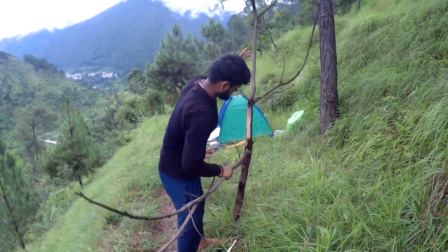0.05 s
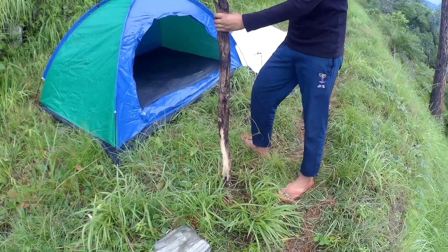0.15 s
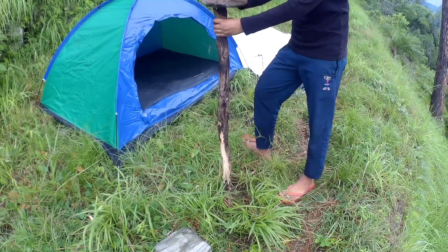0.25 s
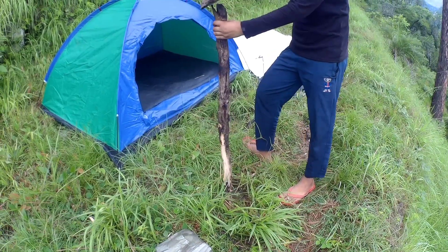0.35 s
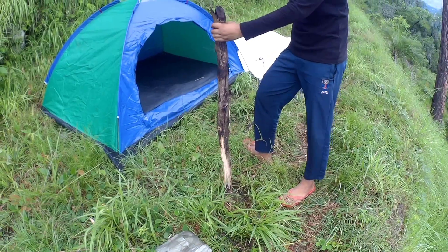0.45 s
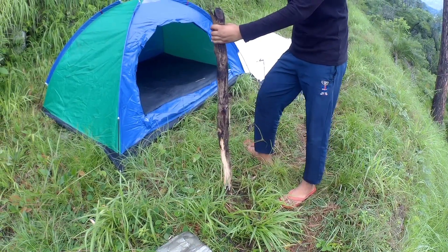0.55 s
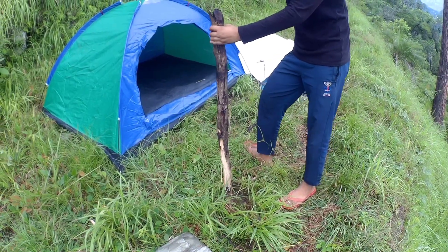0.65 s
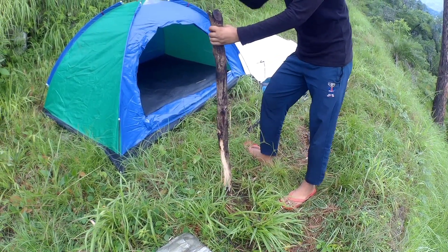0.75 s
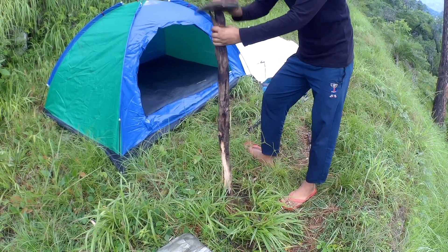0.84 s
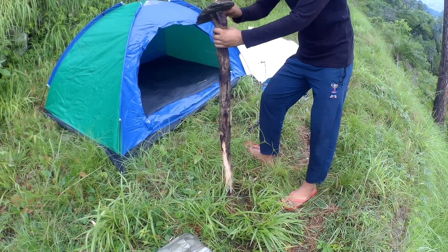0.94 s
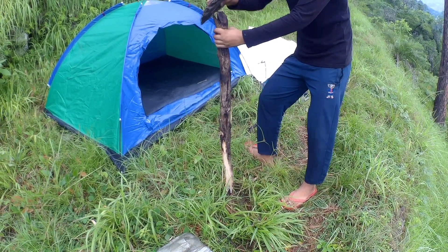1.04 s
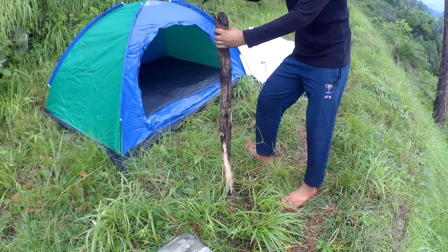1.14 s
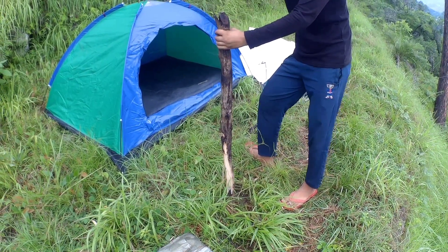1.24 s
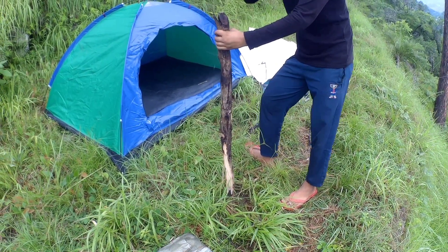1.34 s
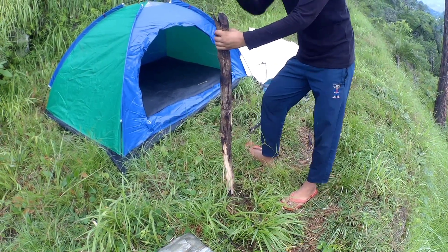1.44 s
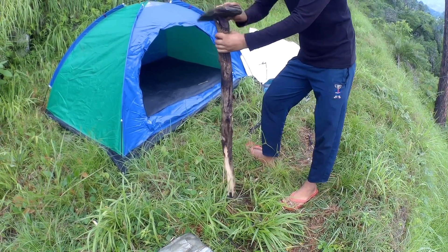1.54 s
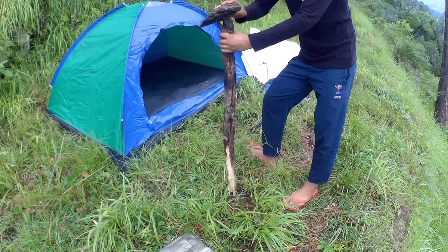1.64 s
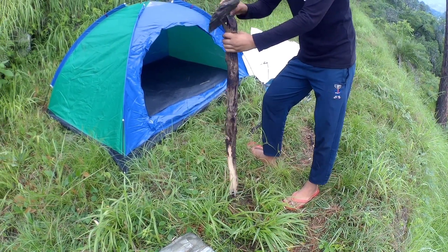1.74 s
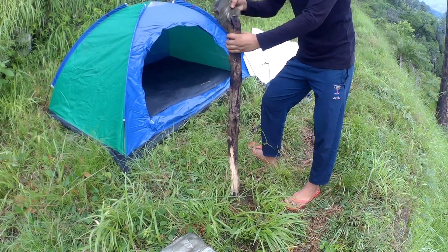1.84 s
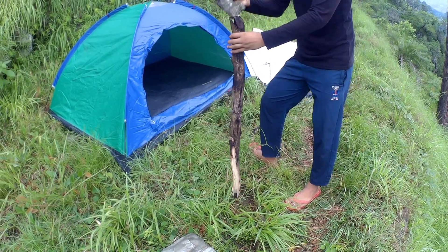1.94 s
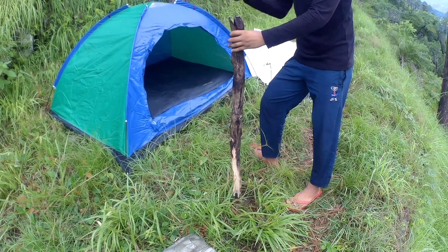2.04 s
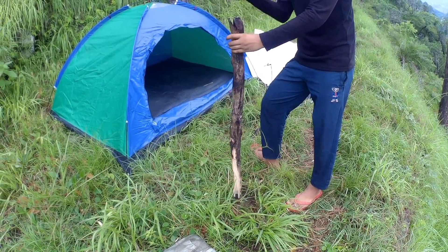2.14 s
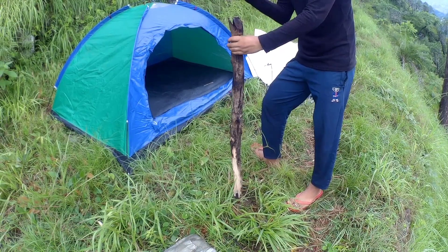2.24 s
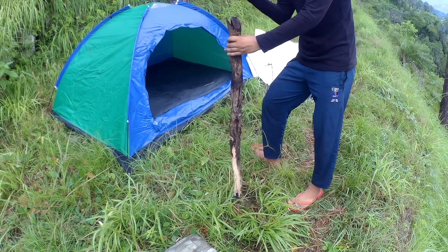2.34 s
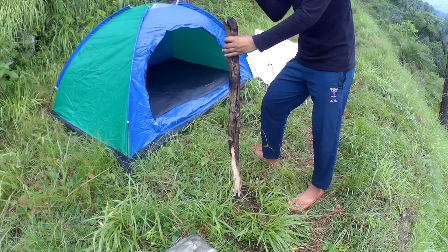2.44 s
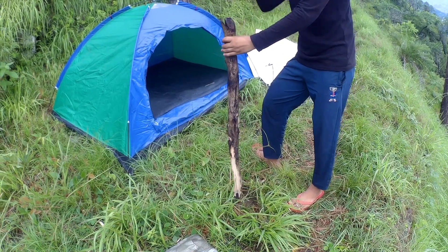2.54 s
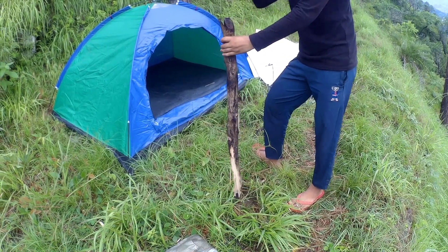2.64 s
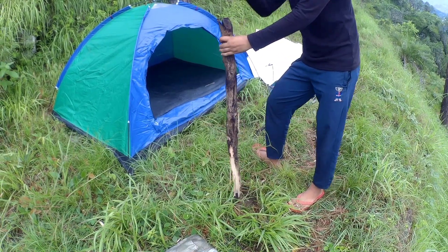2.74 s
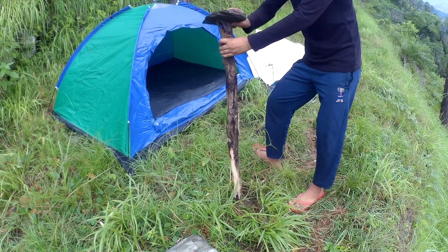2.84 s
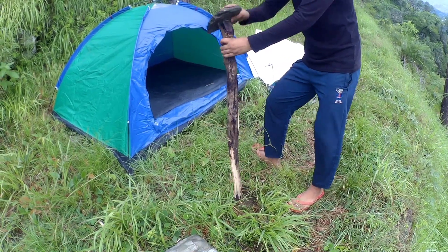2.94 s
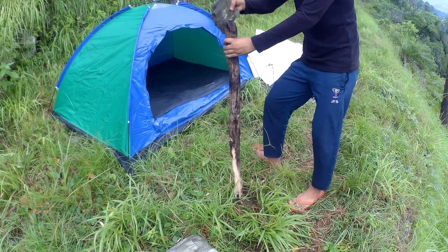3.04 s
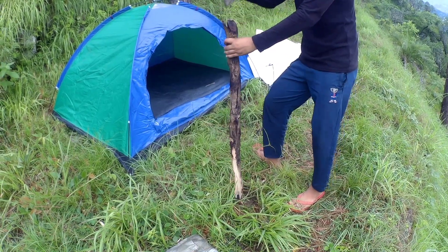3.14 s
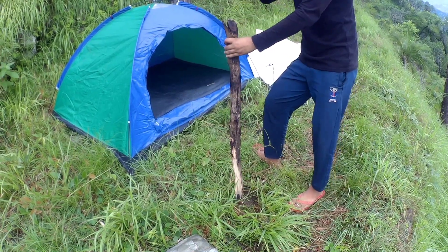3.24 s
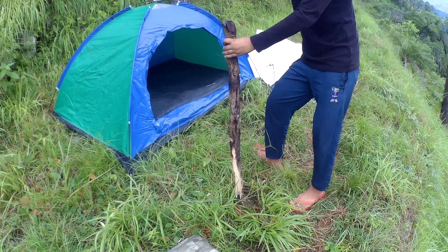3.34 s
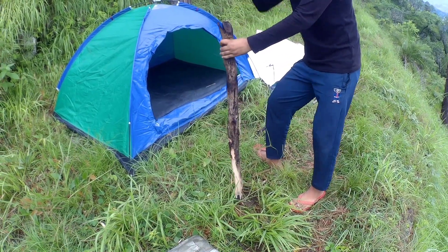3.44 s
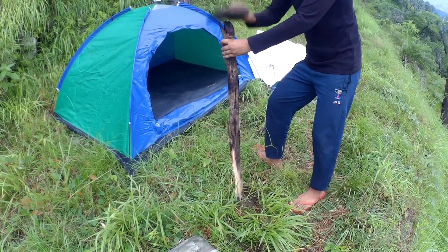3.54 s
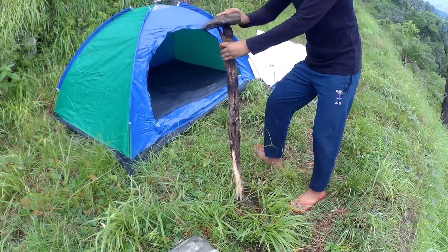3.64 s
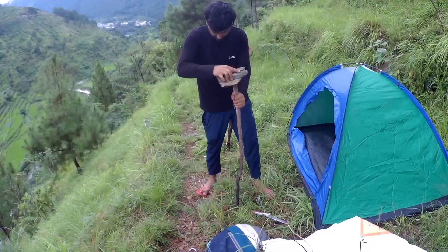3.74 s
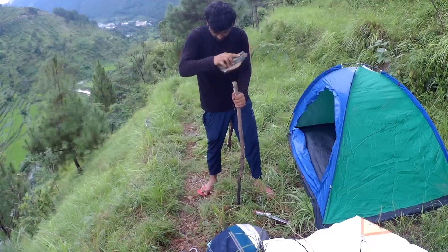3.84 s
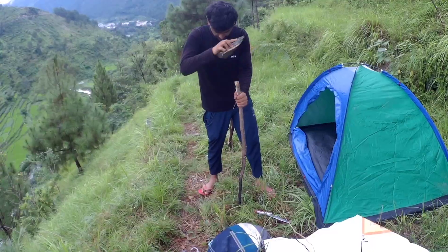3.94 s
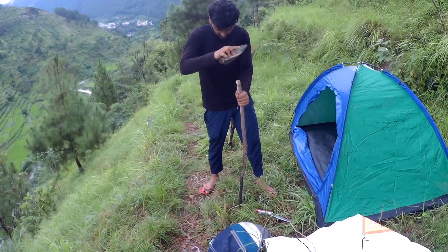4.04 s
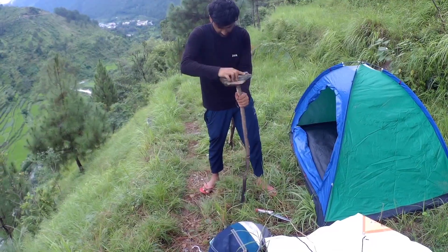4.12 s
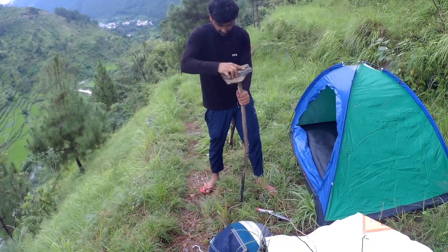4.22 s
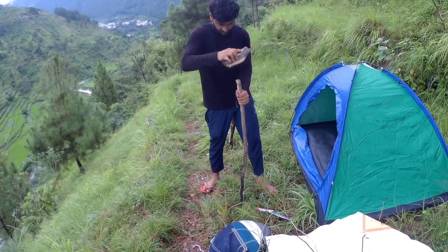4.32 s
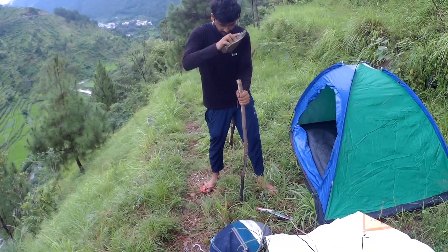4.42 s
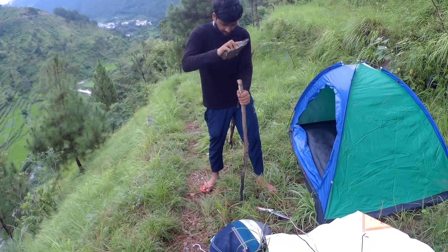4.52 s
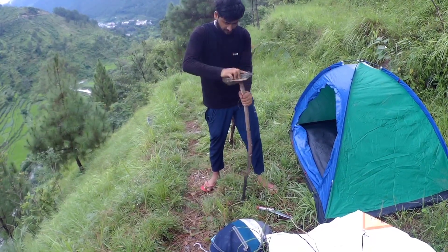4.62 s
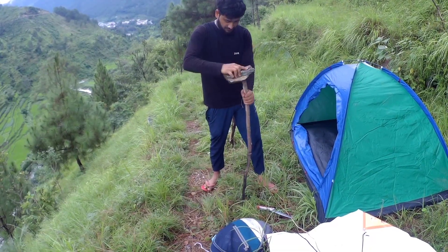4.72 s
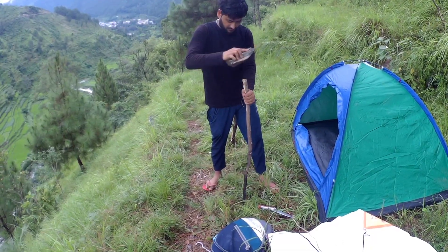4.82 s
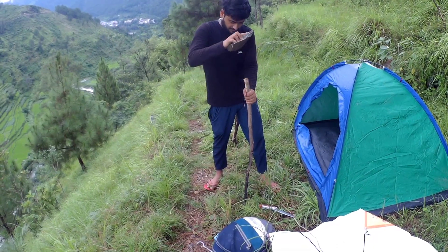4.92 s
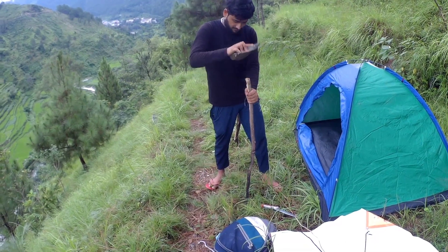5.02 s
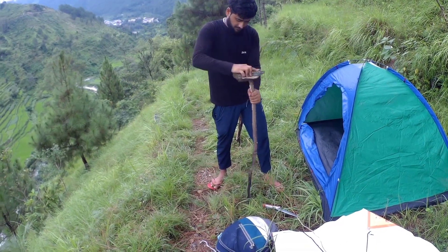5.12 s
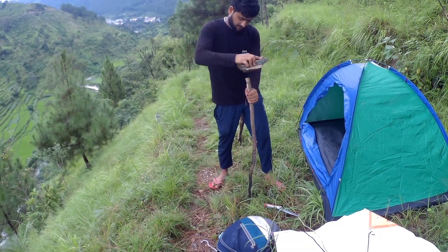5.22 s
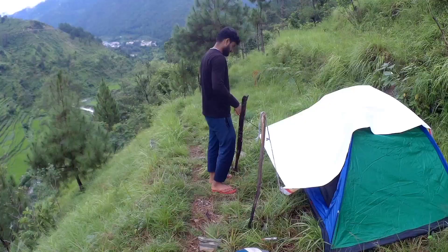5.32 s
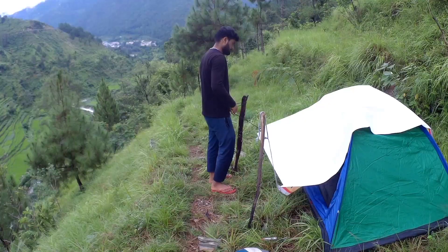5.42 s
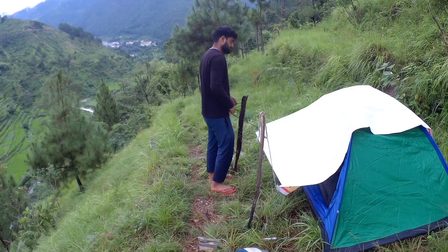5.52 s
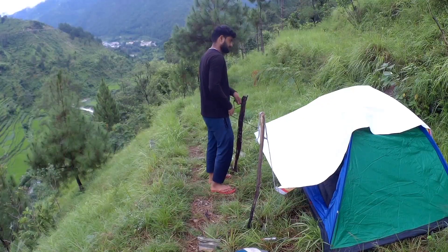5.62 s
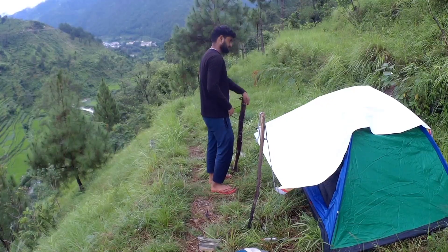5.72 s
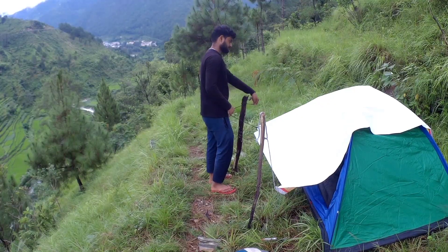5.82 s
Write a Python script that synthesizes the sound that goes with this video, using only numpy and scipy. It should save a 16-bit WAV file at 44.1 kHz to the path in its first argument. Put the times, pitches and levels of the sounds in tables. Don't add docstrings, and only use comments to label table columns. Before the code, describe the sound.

A stone strikes a wooden stake with five hard, woody knocks up close, then three duller distant ones, over faint valley rush and hiss.

```python
import sys
import numpy as np
from scipy import signal
from scipy.fft import rfft, irfft
from scipy.io import wavfile
from scipy.ndimage import uniform_filter1d

SR = 44100
rng = np.random.default_rng(int(sys.argv[2]) if len(sys.argv) > 2 else 0)


def volts_from_db(level):
    exponent = np.asarray(level, float) / 20
    return 10 ** exponent


def unload_audio(sound):
    columns = np.transpose(np.atleast_2d(sound))
    steps = np.round(np.clip(columns, -1, 1) * 32767)
    wavfile.write(sys.argv[1], SR, steps.astype(np.int16))


N = 258864
EDGE_HZ = 12570


def add(track, s, sound):
    i = int(s * SR)
    track[i:i + len(sound)] += sound[:N - i]


def walk(rate_hz):
    hold = int(SR / rate_hz)
    levels = np.repeat(rng.standard_normal(N // hold + 1), hold)
    return 1.6 * uniform_filter1d(uniform_filter1d(levels, hold), hold)[:N]


def band(x, lo_hz, hi_hz):
    return signal.sosfilt(signal.butter(2, [lo_hz, hi_hz], "bandpass", fs=SR, output="sos"), x)


def keep_band(x, inside):
    return irfft(rfft(x) * inside, N)


def burst(lo_hz, hi_hz, t60_s, rise_s):
    t = np.arange(SR // 2) / SR
    noise = band(rng.standard_normal(len(t)), lo_hz, hi_hz)
    return noise / noise.std() * (1 - np.exp(-t / rise_s)) * 1000 ** (-t / t60_s)


def ring(modes, contact_s):
    t = np.arange(SR // 4) / SR
    out = sum(volts_from_db(db) * np.sin(2 * np.pi * hz * t) * 1000 ** (-t / t60_s) for hz, db, t60_s in modes)
    push = np.sin(np.pi * np.clip(t[:512] / contact_s, 0, 1)) + 1e-9
    return np.convolve(out, push / push.sum())[:len(t)]


def swell(modes, return_s, first, t60_of):
    t = np.arange(SR // 4) / SR
    peak_s = return_s + .0011
    rise = np.clip(t / peak_s, 0, 1)
    grow = np.minimum(t / 0.0017, 1) * (first + (1 - first) * rise ** 1.47)
    early = np.minimum(t / .0014, 1) * (.65 + .35 * rise)
    after = np.maximum(t - peak_s, 0)
    out = 0
    for k, (hz, db) in enumerate(modes):
        if hz < 1100:
            wave = grow * np.sin(2 * np.pi * hz * (t - return_s))
        else:
            wave = (-1) ** k * early * np.sin(2 * np.pi * hz * t)
        out = out + volts_from_db(db) * wave * 1000 ** (-after / t60_of(hz))
    return band(out, 132, 3800)


def valley(spectrum):
    hz = np.maximum(np.arange(N // 2 + 1) * SR / N, 1)
    points = np.array(spectrum)[:-1]
    noise = rfft(rng.standard_normal(N)) * volts_from_db(np.interp(np.log(hz), np.log(points[:, 0]), points[:, 1]))
    noise = noise / irfft(noise * (hz > 150) * (hz < 2500), N).std()
    step = 2 * np.log2(hz / 20)
    out = 0
    for k in range(20):
        share = np.clip(1 - np.abs(step - k), 0, 1)
        flicker_db = (1.2 if k < 14 else .4) * walk(7.7)
        out = out + irfft(noise * share, N) * volts_from_db(flicker_db)
    return out


# (frequency [Hz], level per Hz [dB])
OPENING_COLOUR = [(18, -46), (30, -14), (98, -6), (300, -7.5), (600, -9), (1000, -11), (1750, -16.5),
                  (2300, -16.5), (2900, -27), (3500, -28), (4300, -35.5), (8000, -34), (12300, -36.5),
                  (16000, -63)]
CLOSE_COLOUR = [(15, -49), (25, -3), (55, -0.5), (110, -1.5), (220, -1.5), (580, -4), (1000, -4.5),
                (1500, -8), (2000, -12), (2500, -21), (3200, -24), (4500, -28), (12300, -30), (16000, -47)]
FAR_COLOUR = [(15, -29), (25, -2), (60, -4), (180, -1.5), (450, -2.5), (850, -6), (1700, -11.5),
              (2200, -9.5), (2550, -13.5), (2950, -22), (3500, -24), (4200, -29), (12300, -30.5),
              (16000, -44)]
LAST_COLOUR = [(15, -40), (25, -4), (150, -4.5), (401, -1), (592, -6), (851, -7.5), (920, -7), (1470, -11),
               (1800, -14), (2400, -10.5), (3830, -30), (12300, -31.5), (16000, -57), (22000, -120)]
# (time [s], level [dB])
RIVER = [(0.0, -49), (0.69, -50), (1.6, -50.5), (1.7, -49), (2.71, -51), (3.6, -50.5), (4.63, -47.5),
         (4.92, -50), (5.87, -50.5)]
# (start [s], silence [s], fade-in [s])
PLACES = [
    (-.1, 0.0079, .01),
    (0.15, 0, 0.034),
    (3.749, 0.025, 0.016),
    (5.3757, 0, 0.027),
]


def river_valley():
    t = np.arange(N) / SR
    river = volts_from_db(np.interp(t, *np.transpose(RIVER)))
    out = np.zeros(N)
    ends = [place[0] for place in PLACES[1:]] + [N / SR]
    colours = (OPENING_COLOUR, CLOSE_COLOUR, FAR_COLOUR, LAST_COLOUR)
    for (start, silent, fade), end, colour in zip(PLACES, ends, colours):
        rise = np.clip((t - start - silent) / fade, 0, 1)
        gate = np.where(rise > 0, 0.12 + 0.95 * np.sin(np.pi / 2 * rise) ** 2, .012)
        gate = gate * (t >= start) * (t < end)
        out = out + gate * river * valley(colour)
    return out


# (start [s], length [s], chance of a glint per band and frame [0-1])
RUSTLES = [
    (1.0, .28, .15),
    (1.68, .3, .2),
    (2.33, .22, .18),
    (3.24, .16, .2),
    (3.78, .12, .25),
    (4.1, .7, .35),
    (5.25, .14, .2),
]


def glint_chance(s):
    chance = .015
    for blow in BLOWS + FAR_BLOWS:
        chance = chance + .7 * (s >= blow[0]) * np.exp(-np.abs(s - blow[0]) / .06)
    return chance + sum(share * (s >= start) * (s < start + length) for start, length, share in RUSTLES)


GLINT_SHARE = np.array([.8, .9, 1, 1, .8, .7, .5, .2])


def treble_glints():
    frame_len = 1024
    out, t = np.zeros(N), np.arange(2 * frame_len) / SR
    window = np.sin(np.pi * np.arange(2 * frame_len) / (2 * frame_len))
    for frame, row in enumerate(rng.random((N // frame_len, 8, 4))):
        chance = glint_chance((frame + 1) * frame_len / SR)
        for k in np.nonzero(row[:, 0] < chance * GLINT_SHARE)[0]:
            hz = EDGE_HZ + 345 * (k + row[k, 1:3])
            pair = np.sin(2 * np.pi * (hz[:, None] * t + row[k, 2:, None])).sum(axis=0)
            add(out, frame * frame_len / SR, volts_from_db(-84 - .4 * k) * window * pair)
    return out


def bird():
    length_s, pitch_hz = .013, 6700
    out, t = np.zeros(N), np.arange(int(length_s * SR)) / SR
    add(out, .017, volts_from_db(-60) * np.sin(np.pi * t / length_s) * np.sin(2 * np.pi * pitch_hz * t))
    return out


# (time [s], level [dB], low edge [Hz], t60 [s])
GRIT = [
    (4.214, -58, 3200, 0.054),
    (4.704, -66, 2900, .04),
    (4.7215, -51, 2880, .07),
    (4.734, -56, 2980, 0.049),
    (5.188, -64, 3000, 0.06),
    (.277, -58, 4200, .06),
]


def grit():
    out = np.zeros(N)
    for s, db, lo_hz, t60_s in GRIT:
        grain = volts_from_db(3.5 * np.repeat(rng.standard_normal(SR // 200 + 1), 100)[:SR // 2])
        hiss = burst(lo_hz, 4900, t60_s, 0.0013) + volts_from_db(-3.5) * burst(4300, 9000, t60_s, 0.0013)
        add(out, s, volts_from_db(db) * grain * hiss)
    return out


# (time [s], peak [dB], pitch [Hz], upper ring [dB], thud [dB])
FAR_BLOWS = [
    (4.214, -35, 308, -2, -17),
    (4.7042, -29, 273, -6, -23),
    (5.189, -28.5, 242, -18, -15),
]


def far_blows():
    out, upper_hz = np.zeros(N), 952
    for s, db, low_hz, upper_db, thud_db in FAR_BLOWS:
        add(out, s, volts_from_db(db) * swell([(low_hz, 0), (1.52 * low_hz, -9)], 0.00323, 0.41, lambda hz: .03))
        upper = [(upper_hz, db + upper_db, .035), (1.14 * upper_hz, db + upper_db - 8, .025)]
        add(out, s, ring(upper, 0.00031))
        add(out, s, volts_from_db(db - 14) * burst(500, 1340, 0.044, 0.0014))
        add(out, s + 0.0153, ring([(59.7, db + thud_db, 0.23)], 0.0057))
    return out


# (time [s], peak [dB])
BOUNCES = [
    (0.3, -39),
    (0.984, -36),
    (1.6308, -31),
    (2.9308, -26.5),
    (3.659, -41),
]


def bounces():
    out, low_hz = np.zeros(N), 270
    for s, db in BOUNCES:
        add(out, s, volts_from_db(db - 2) * swell([(low_hz, 0), (1.6 * low_hz, -5)], .0035, .4, lambda hz: .018))
        add(out, s, volts_from_db(db - 19) * burst(300, 1100, 0.05, 0.004))
    return out


# (time [s], peak [dB], strength at first contact [0-1], crack [dB], thud [dB])
BLOWS = [
    (0.2757, -10, 0.26, -35, -32.5),
    (0.9284, -9.5, 0, -35, -29),
    (1.5839, -4, 0.35, -32.5, -31),
    (2.8864, -5, 0.06, -31.5, -27.5),
    (3.62, -4, 0.6, -30.5, -27),
]
# (frequency [Hz], level [dB])
MODES_OF_BLOW = [
    [(230, 0), (325, 5.5), (410, -5), (510, 3), (680, -34), (850, -9), (1050, -6), (1290, -7), (1450, -1),
     (1850, -6), (2120, -8), (2550, -15)],
    [(240, 4), (340, -6.5), (455, 4), (700, -6.5), (900, -1), (1140, -11.5), (1300, -19), (1480, -10),
     (1830, -7.5), (2080, -21), (2300, -23), (2500, -21)],
    [(240, -0.5), (340, -2), (460, 4), (660, -7), (860, -3.5), (1000, 0.5), (1300, -8), (1530, -3.5),
     (1750, -13), (2080, -6.5), (2400, -7), (3300, -26)],
    [(250, 1), (340, -2.5), (460, 4), (660, -13), (870, -5.5), (1000, 0), (1180, -12), (1570, 1.5),
     (1850, -4.5), (2150, -8.5), (2450, -12), (3150, -24)],
    [(260, -0.5), (350, -10), (490, 3), (800, -7), (1030, -8), (1180, -12.5), (1400, -6), (1590, 2),
     (1780, -8.5), (2000, -16), (2330, -10), (2500, -20)],
]
# (frequency [Hz], t60 [s])
DAMPING = [(240, 0.017), (480, 0.02), (1000, 0.027), (1600, 0.018), (2500, 0.0068)]


def close_blows():
    out, damping = np.zeros(N), np.transpose(DAMPING)
    thud_hz = 53
    for (s, db, first, crack_db, thud_db), modes in zip(BLOWS, MODES_OF_BLOW):
        knock = np.zeros(SR // 2)
        add(knock, 0, swell(modes, .00396, first, lambda hz: np.interp(hz, *damping)))
        knock = knock / np.abs(knock).max()
        touch = ring([(390, -10.5, 0.014), (1100, -26.5, 0.0061)], 0.00018)
        add(knock, 0, band(touch, 112, 6500))
        add(knock, .0115, volts_from_db(-20) * band(knock, 630, 2400)[:SR // 4])
        add(knock, .0162, volts_from_db(-21.5) * band(knock, 100, 460)[:SR // 4])
        crack = volts_from_db(3) * burst(2140, 3500, 0.028, 0.0017) + volts_from_db(-8) * burst(5300, 8300, 0.025, 0.0003)
        knock = knock + volts_from_db(crack_db) * crack
        knock = knock + volts_from_db(-21) * burst(180, 690, 0.097, 0.008)
        knock = knock + volts_from_db(-33.5) * burst(610, 1660, 0.074, 0.0033)
        knock = knock + volts_from_db(-18) * burst(650, 1760, 0.037, 0.0016)
        knock = knock + volts_from_db(-33.5) * burst(170, 2360, 0.1, 0.019)
        thud = ring([(thud_hz, thud_db, .2), (2.07 * thud_hz, thud_db + 4.5, .07)], 0.0051)
        add(knock, .00785, thud)
        add(out, s, volts_from_db(db - 1.23) * knock)
    return out


def scene():
    t = np.arange(N) / SR
    close = (close_blows() + bounces()) * (t < PLACES[2][0])
    return (river_valley() + bird() + grit() + far_blows() + close)[None]


def low_pass(x):
    return signal.sosfilt(signal.butter(12, 15630, fs=SR, output="sos"), x)


# (start [s], length [s])
DROPS = [
    (1.559, .030),
    (2.869, .032),
    (3.608, .029),
    (3.748, .03),
]


def record(dry):
    t, hz = np.arange(N) / SR, np.arange(N // 2 + 1) * SR / N
    presence = volts_from_db(np.interp(hz, [8800, 10400], [-.9, .8]) * (hz > 6000))
    out = keep_band(dry[0], presence * (hz < EDGE_HZ)) + treble_glints()
    treble = keep_band(out, hz > 8600)
    for start, length in DROPS:
        out = out - treble * np.clip(np.minimum(t - start, start + length - t) / 0.0015, 0, 1)
    hiss = keep_band(rng.standard_normal(N), (hz >= 8600) * (hz < 15500))
    start, silent, fade = PLACES[2]
    out = out + volts_from_db(-80.5) * hiss * (1 - .9 * (t > start) * (t < start + silent))
    return low_pass(out[None])


dry = scene()
out = record(dry)
unload_audio(out)
```